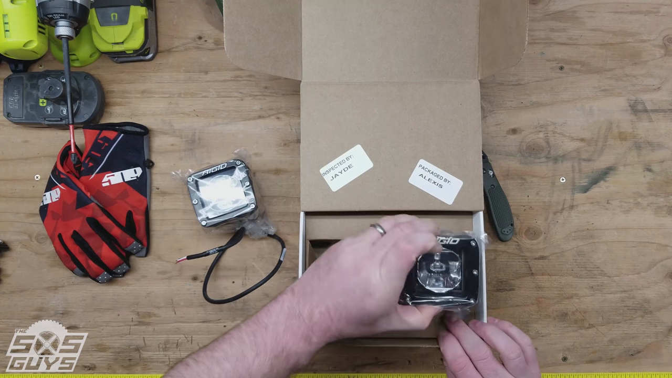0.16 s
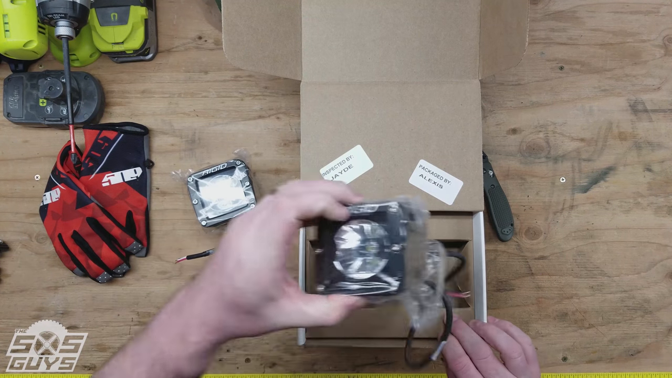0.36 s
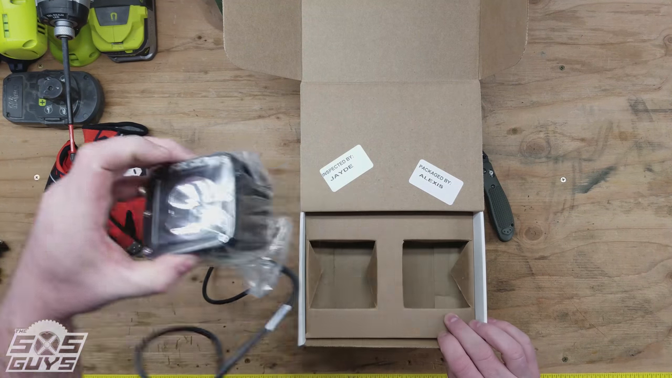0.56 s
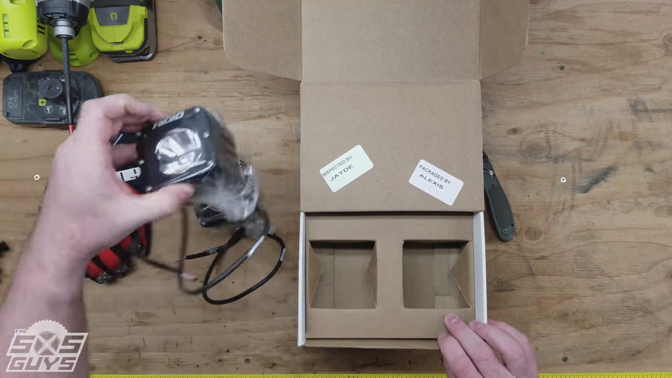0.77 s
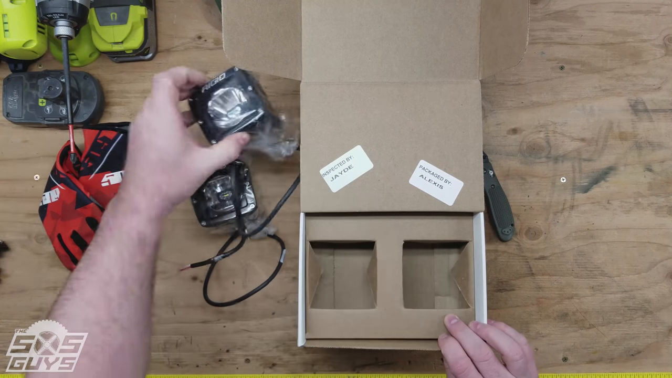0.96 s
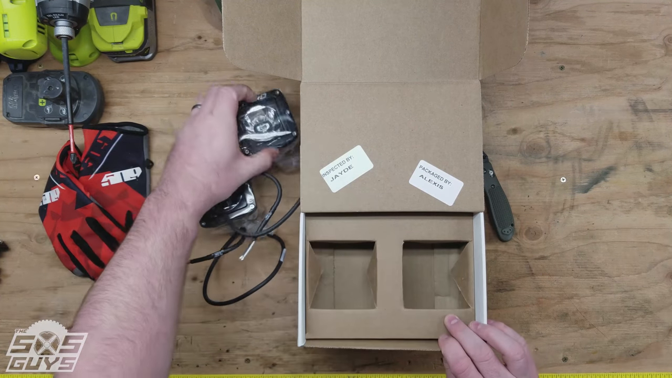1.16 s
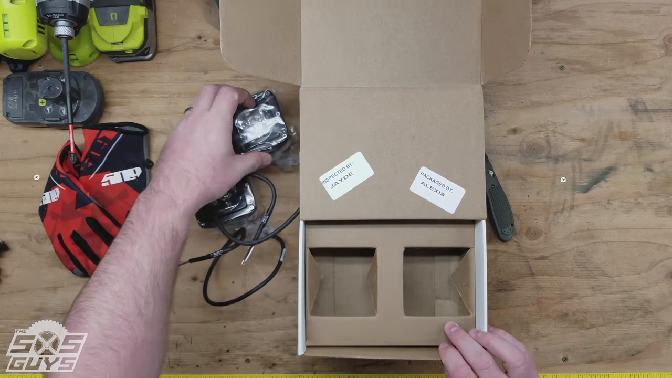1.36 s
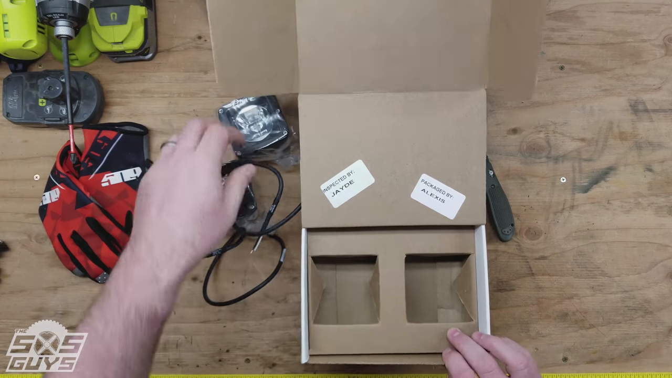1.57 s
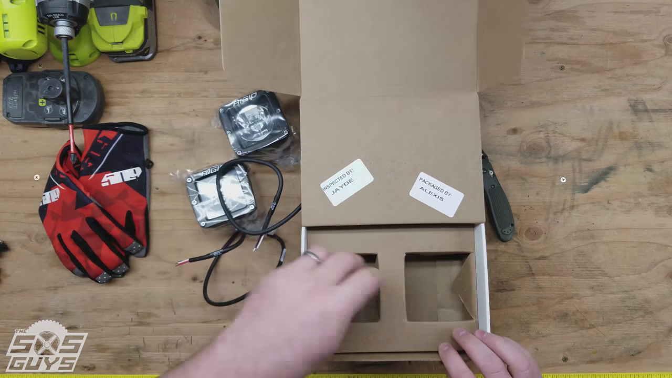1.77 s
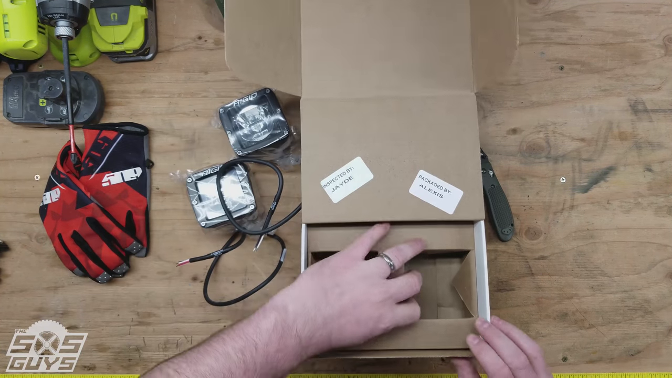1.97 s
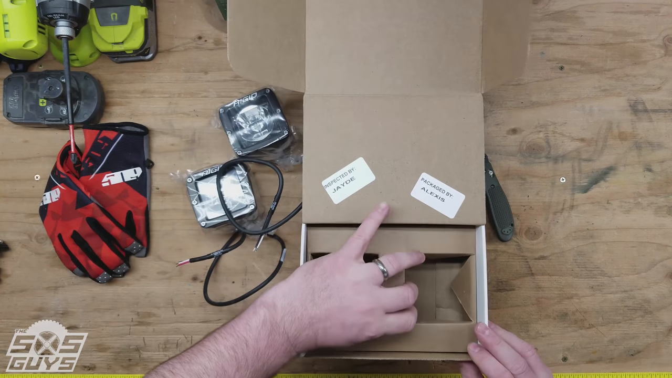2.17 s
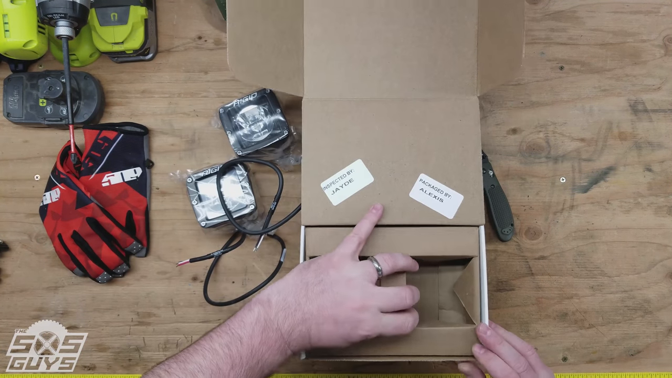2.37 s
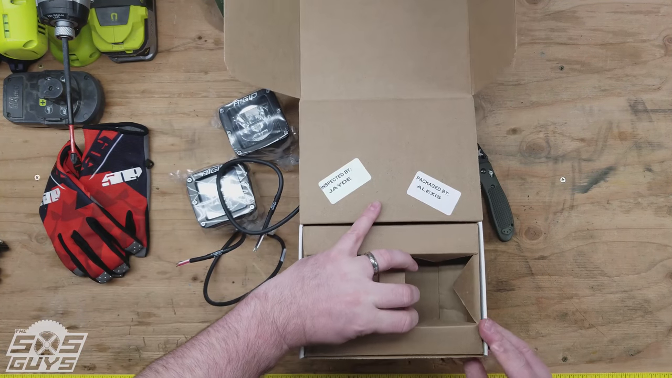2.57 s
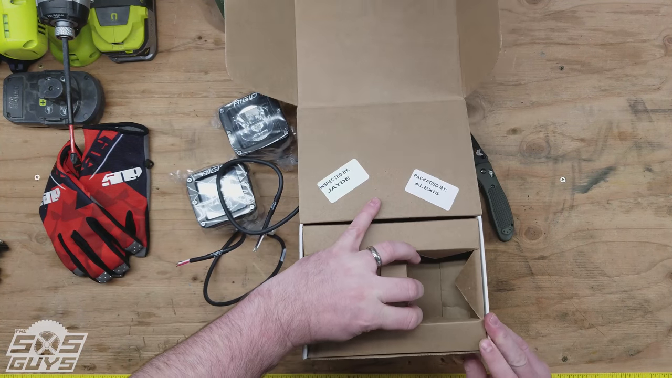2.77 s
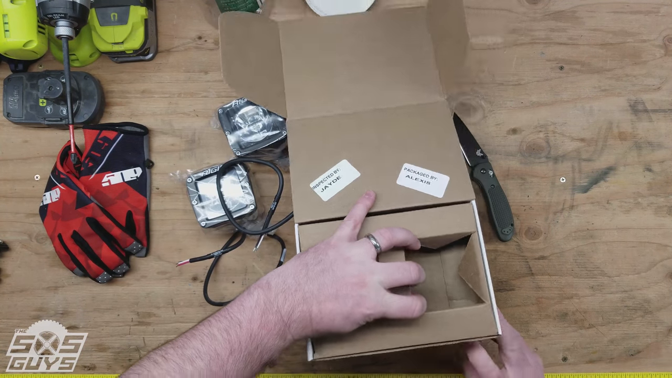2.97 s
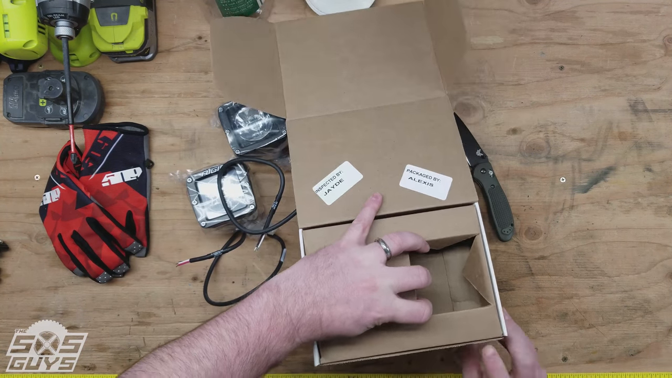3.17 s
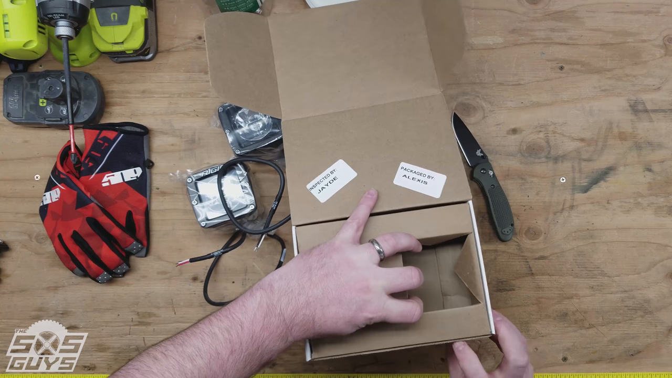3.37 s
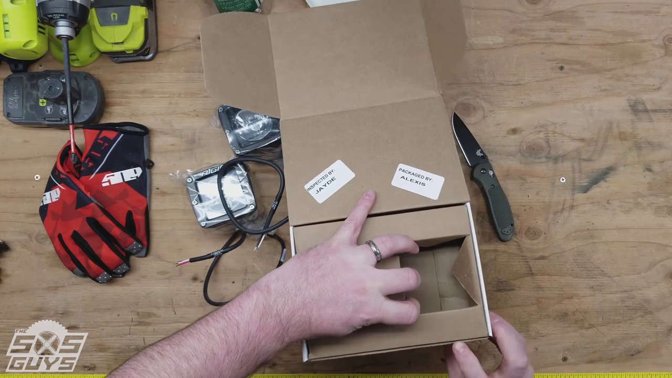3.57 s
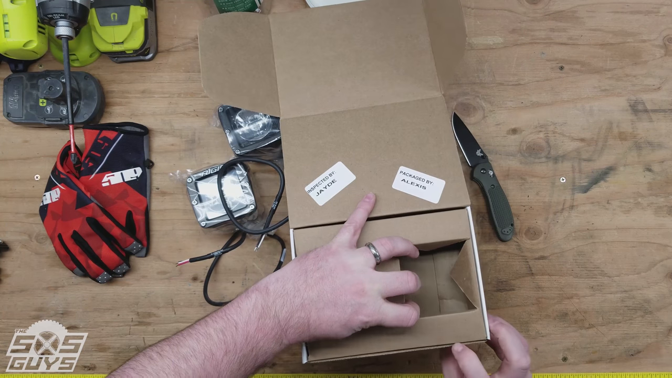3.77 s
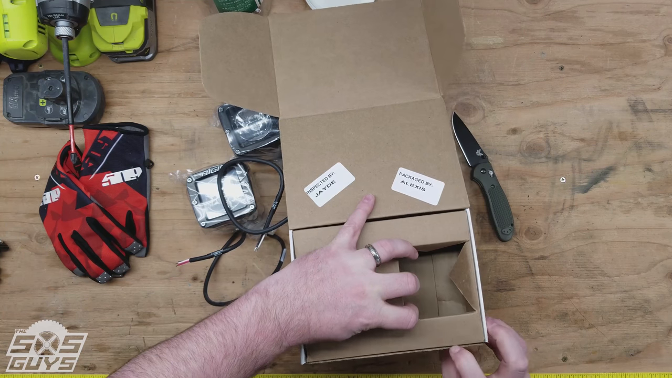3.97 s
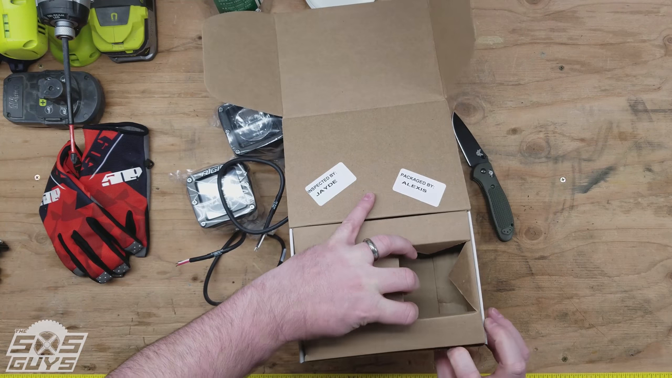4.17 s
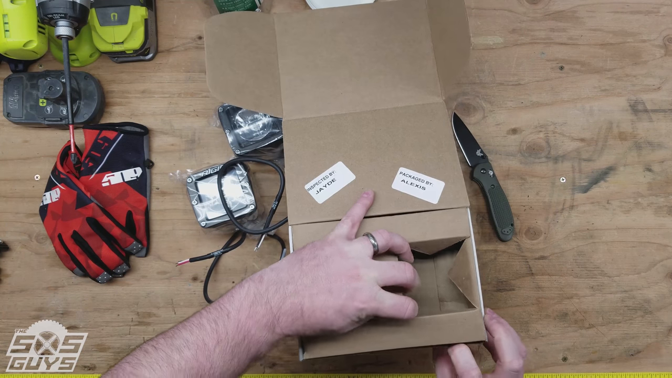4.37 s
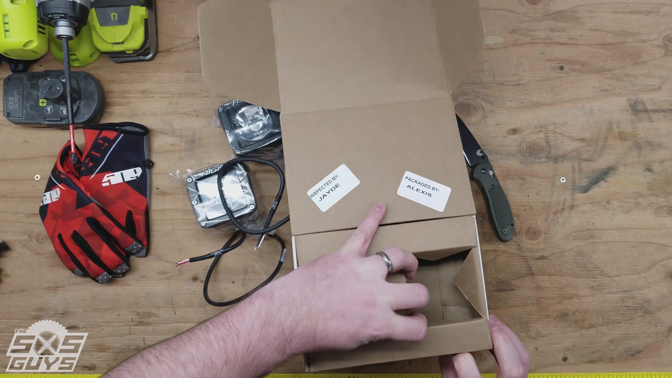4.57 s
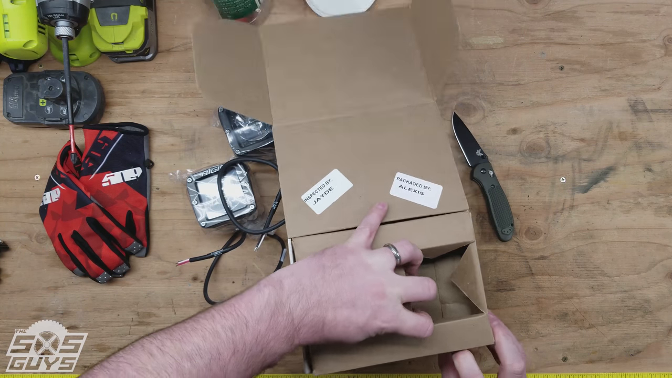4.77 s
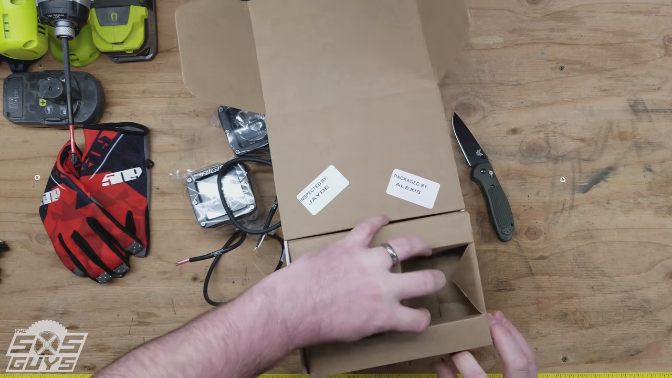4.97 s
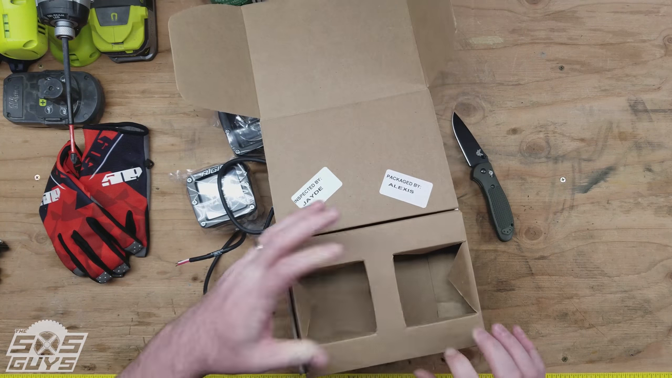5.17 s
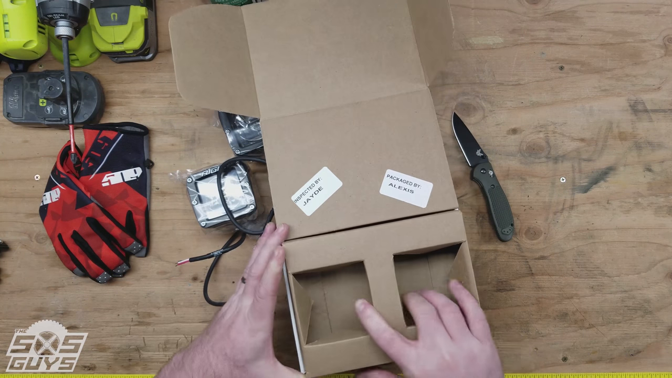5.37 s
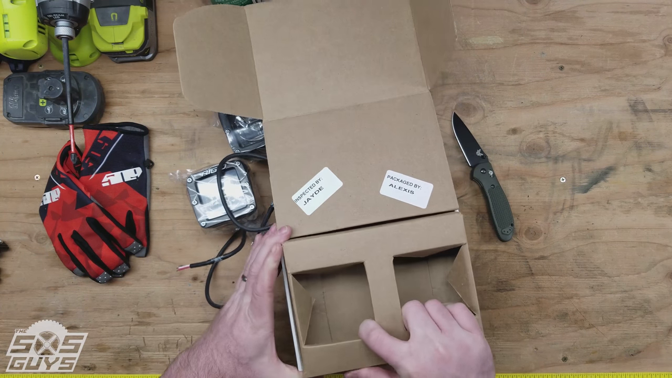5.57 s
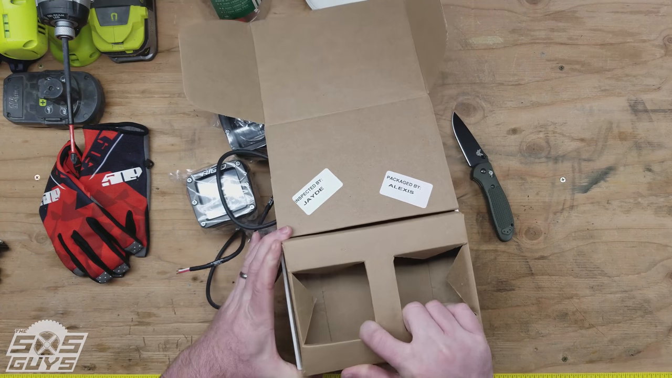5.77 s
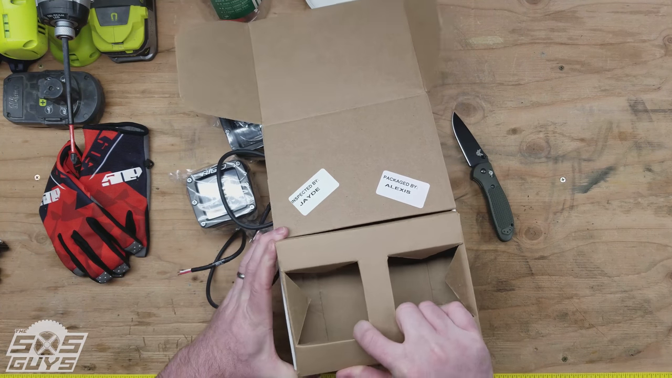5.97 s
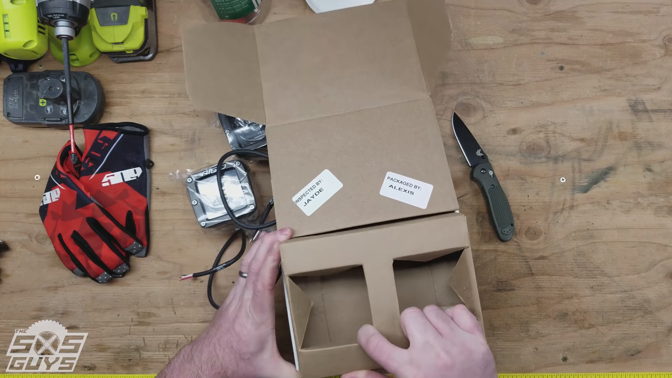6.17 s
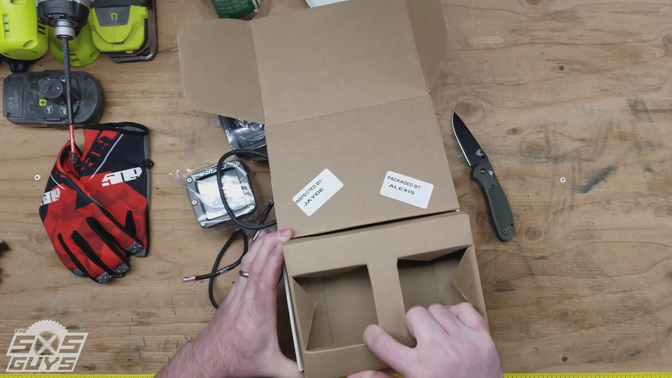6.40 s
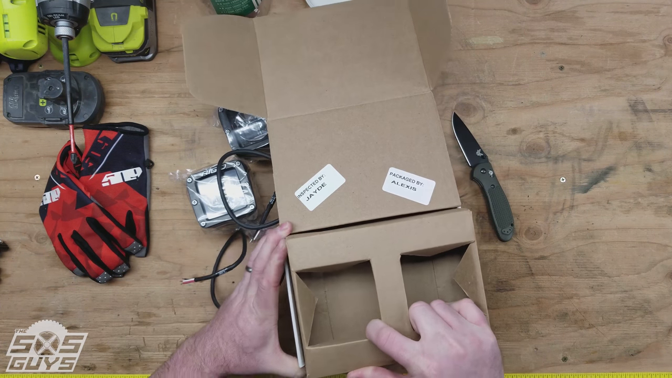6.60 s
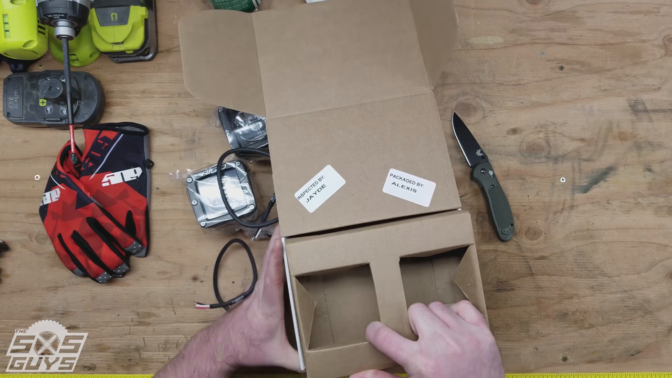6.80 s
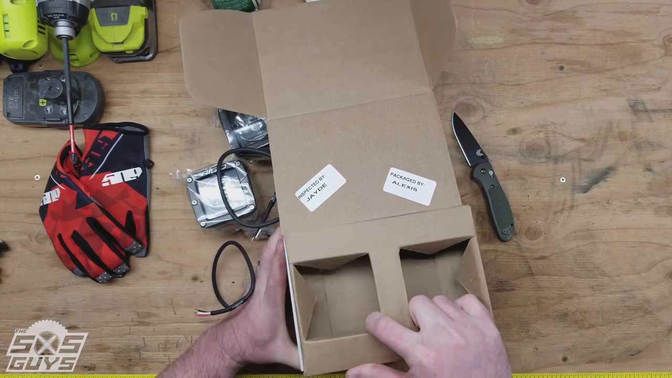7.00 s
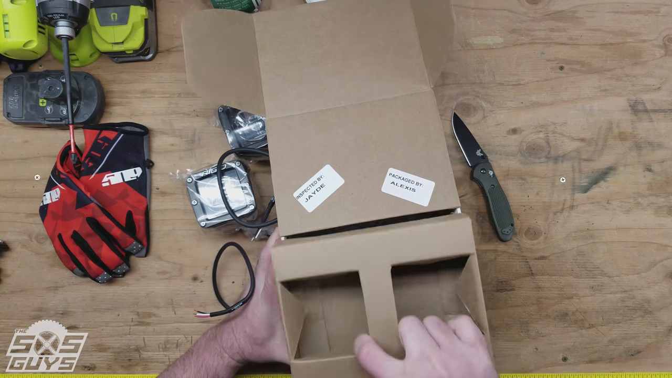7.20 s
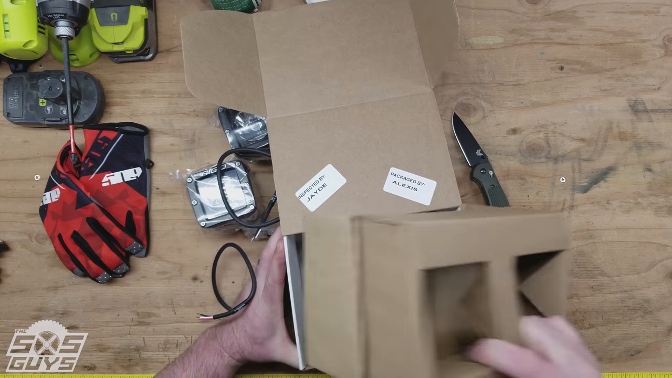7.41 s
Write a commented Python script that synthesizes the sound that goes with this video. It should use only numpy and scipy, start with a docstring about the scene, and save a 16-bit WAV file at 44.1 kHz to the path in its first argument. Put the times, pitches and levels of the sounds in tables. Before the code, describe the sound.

Hands scrape and tug at a hollow cardboard box, with plastic crackles, small clicks and one wooden thump early on.

```python
"""In a workshop, at a wooden bench, hands pull a heavy lamp in a plastic bag from a cardboard box.
The lamp is set down with a thump that makes the bench ring. Then the box's insert is tugged out in
short strokes: card grips and slips on card, so it hisses, drums in the hollow box, knocks and clicks.
Plastic crackles, small metal parts ping, and the rubbing gives one thin, high squeak.
A low rumble fills the room, and the walls echo briefly."""
import sys
import numpy as np
from scipy import signal
from scipy.fft import rfft, irfft, next_fast_len
from scipy.io import wavfile
from scipy.ndimage import uniform_filter1d, map_coordinates

SR = 44100
rng = np.random.default_rng(int(sys.argv[2]) if len(sys.argv) > 2 else 0)


def waveform_to_disk(signal):
    """Save audio, clipped to [-1, 1], as 16-bit WAV at the path in sys.argv[1]."""
    frames = np.transpose(np.atleast_2d(signal))
    scaled = np.clip(frames, -1, 1) * 32767
    samples = np.round(scaled).astype(np.int16)
    wavfile.write(sys.argv[1], SR, samples)


N = 328304

# The tone of the hiss. Each row: frequency in Hz, level in dB.
HISS_TONE = [(1760, -23.5), (3000, -6.5), (3800, -1), (5120, 0.5), (7370, -1.5), (9000, -15.5),
             (11400, -13), (15100, -13), (16200, -31), (16500, -40.5)]
# The tone of the scrape. Each row: frequency in Hz, level in dB.
SCRAPE_TONE = [(530, -13), (900, 0), (995, -2), (1120, -2), (1370, -3), (1490, -1.5), (1770, -4.5),
               (2010, -1), (2440, -1), (2840, -1.5), (3240, -3.5), (4000, -15.5), (5200, -18), (8800, -120)]
# Notes of the hollow channels inside corrugated card. Each row: pitch in Hz, width in Hz, boost in dB.
CARD_CHANNELS = [(1366, 81, 3), (1800, 40, 8), (2436, 98, 2), (2780, 23, 7)]
# Notes of the box's panels. Each row: pitch in Hz, width in Hz, level in dB.
BOX_PANELS = [(376, 29, 4), (518, 62, -6), (636.4, 35, -2), (816.5, 69, -7)]
# Rubs, tugs and crumples. Each row: time of full strength, then swell, hold and fade, all in seconds,
# then levels in dB for the hiss, top hiss, rasp, upper rasp, panels and air in the box.
STROKES = [(0.048, 0.15, 0.01, 0.396, -56.5, -65.5, -57, -64, -56, -59),
           (0.092, 0.057, 0.079, 0.182, -50, -55, -47, -53, -49, -54),
           (0.192, 0.066, 0.0027, 0.179, -46.5, -50, -39.5, -47, -37, -41.5),
           (0.283, 0.017, 0.016, 0.036, -56.0, -69.5, -65.5, -60.5, -63.0, -63),
           (0.341, 0.082, 0.0, 0.21, -51, -54, -36, -44, -32, -37.5),
           (0.389, 0.11, 0, 0.11, -43.5, -50, -48.0, -42, -46.0, -54),
           (0.459, 0.014, 0.0059, 0.092, -48, -50.5, -61, -53, -66, -71),
           (0.889, 0.024, 0.0046, 0.1, -49.5, -55.5, -59.5, -61, -51.5, -54),
           (0.952, 0.0444, 0.00051, 0.13, -52, -57.5, -55.5, -63.5, -55, -49),
           (1.02, 0.037, 0.018, 0.19, -50, -56, -55, -59.5, -50.5, -51),
           (1.091, 0.024, 0.05, 0.405, -58.5, -57, -60, -56, -58, -65.5),
           (1.182, 0.045, 0.017, 0.182, -45, -57, -34, -35.5, -64, -52),
           (1.244, 0.022, 0, 0.398, -47.5, -52, -44.5, -57.5, -59, -57),
           (1.371, 0.013, 0.008, 0.03, -55, -64, -63, -67, -65.5, -64.0),
           (1.562, 0.24, 0.04, 0.13, -58, -60.5, -62, -57, -52, -58.5),
           (1.93, 0.031, 0.0046, 0.26, -59, -61, -47, -55.0, -45, -53),
           (2.02, 0.2, 0.019, 0.138, -74, -67, -53, -57.0, -70, -69),
           (2.23, 0.47, 0.122, 0.034, -57.5, -58.5, -55.5, -56, -53, -55),
           (2.339, 0.15, 0.026, 0.2, -49.5, -52.5, -50.5, -47, -46, -36),
           (2.455, 0.158, 0.13, 0.036, -58.5, -61.5, -54.5, -57, -47.5, -44),
           (2.592, 0.018, 0.033, 0.034, -51.5, -52.5, -51, -49.5, -42, -34),
           (2.672, 0.238, 0.036, 0.23, -59.5, -61.5, -57.5, -54, -47, -46.5),
           (2.829, 0.19, 0.024, 0.041, -65, -61, -71, -59.5, -55.5, -48.5),
           (2.981, 0.21, 0.014, 0.19, -45, -44.5, -45.5, -46, -38.5, -43.5),
           (3.098, 0.037, 0.02, 0.11, -64, -60, -51, -51, -42.5, -44.5),
           (3.17, 0.126, 0.0011, 0.42, -54.5, -53.0, -57, -58.5, -63, -51),
           (3.297, 0.23, 0.046, 0.27, -60.5, -61.5, -55, -59, -49.5, -53.5),
           (3.58, 0.64, 0.001, 0.65, -66, -80, -68, -72.5, -61.5, -57.5),
           (3.747, 0.17, 0.15, 0.82, -71.5, -67.5, -73, -71, -67, -58.5),
           (3.923, 0.053, 0.001, 0.049, -61, -60.5, -58.5, -53.5, -51, -43.5),
           (4.142, 0.067, 0.021, 0.18, -49.0, -48, -50, -47.5, -58, -34.5),
           (4.251, 0.28, 0, 0.3, -52, -54, -49.5, -48.5, -38.5, -37.5),
           (4.49, 0.08, 0.08, 0.48, -62, -62, -58.5, -59.5, -55.5, -58),
           (4.605, 0.056, 0.16, 0.42, -66.0, -67, -58, -61, -49, -61.5),
           (4.715, 0.02, 0.028, 0.11, -45.5, -47.5, -50, -43, -46.5, -41.5),
           (4.842, 0.041, 0.041, 0.071, -49, -50, -52.0, -51.0, -44, -44.5),
           (5.006, 0.144, 0.012, 0.178, -54.5, -54.0, -53.5, -53, -49, -45.5),
           (5.072, 0.067, 0.045, 0.16, -49, -55.5, -43.5, -46.0, -43, -50.0),
           (5.255, 0.028, 0, 1, -62.5, -66, -58, -58.0, -50, -51.5),
           (5.313, 0.014, 0.02, 0.171, -57.5, -53.5, -63.5, -59, -66, -54),
           (5.418, 0.094, 0.045, 0.28, -51.5, -51, -54.5, -50, -53.0, -60),
           (5.599, 0.171, 0.019, 0.085, -55.5, -52.5, -51, -55, -48.5, -49.5),
           (5.729, 0.11, 0.058, 0.2, -57, -55.0, -55.5, -54.0, -54, -52.0),
           (5.811, 0.027, 0.039, 0.11, -60, -63.5, -56, -52.5, -46.5, -47.5),
           (5.906, 0.032, 0.02, 0.087, -50.5, -51.5, -47.5, -47, -40, -42.5),
           (6.004, 0.072, 0.042, 0.298, -53, -55, -55.0, -50.5, -46, -45.5),
           (6.169, 0.019, 0.041, 0.382, -55, -54.5, -54.5, -50, -44.5, -41),
           (6.31, 0.084, 0.029, 0.057, -47.5, -49.5, -53, -44.5, -42.5, -41.5),
           (6.434, 0.17, 0, 1, -67.0, -68.5, -67, -59, -49, -47),
           (6.546, 0.052, 0.015, 0.051, -50.5, -53, -49, -50.5, -46, -49.5),
           (6.698, 0.281, 0.043, 0.082, -55, -54.5, -55.5, -56, -51, -69),
           (6.82, 0.069, 0.058, 0.12, -57.5, -55.5, -63.5, -63, -59, -68.5),
           (7.0, 0.024, 0.071, 0.067, -42, -45.5, -47, -46.0, -42.5, -45.5),
           (7.184, 0.066, 0.047, 0.043, -44.5, -44.5, -49.0, -45, -45, -47.5),
           (7.225, 0.034, 0.015, 0.068, -44, -47.0, -59, -61, -35, -28),
           (7.358, 0.42, 0, 0.261, -42.5, -43, -43.5, -47.5, -37, -39)]
def card_rubbing():
    """Card slides on card: it hisses, rasps, and by gripping and slipping drums the box and its air."""
    hiss_gain, top_gain, rasp_gain, upper_gain, panel_gain, air_gain = map(
        stroke_gain, np.transpose(STROKES)[4:])

    fine = friction_noise(grain_db=1.0, grains_per_s=220, patchy_db=2.0)
    hiss_share = lambda f: 1 / (1 + (f / 8800) ** 12)
    hiss = unit_centre(filtered(fine, lambda f: amp(along(HISS_TONE, f)) * hiss_share(f)))
    top = unit_centre(filtered(fine, lambda f: amp(along(HISS_TONE, f)) * (1 - hiss_share(f))))
    hissing = (hiss_gain * hiss + top_gain * top) * grip(CREASES, depth_db=4, lead_s=0.024)

    # Narrow, long patches give hollow notes that linger through a stroke.
    coarse = friction_noise(grain_db=1.5, grains_per_s=170, patchy_db=3, patch_bins=3, patch_frames=20)
    boost_db = lambda f: sum(db * np.abs(resonance(f, hz, width)) ** 2 for hz, width, db in CARD_CHANNELS)
    card = lambda f: amp(along(SCRAPE_TONE, f) + boost_db(f))
    rasp_share = lambda f: 1 / (1 + (f / 2100) ** 8)
    rasp = unit(filtered(coarse, lambda f: card(f) * rasp_share(f)))
    upper = unit(filtered(coarse, lambda f: card(f) * (1 - rasp_share(f))))
    scraping = (rasp_gain * rasp + upper_gain * upper) * grip(EDGE_SNAPS, depth_db=4, lead_s=0.018)

    slips = friction_noise(grain_db=2.5, grains_per_s=90, patchy_db=1.16)
    panel_notes = lambda f: sum((-1) ** k * amp(db) * resonance(f, hz, width)
                                for k, (hz, width, db) in enumerate(BOX_PANELS))
    panels = unit(filtered(slips, lambda f: panel_notes(f) * resonance(f, hz=664, width=700)))
    air = unit(filtered(slips, lambda f: resonance(f, hz=275.6, width=32.4) * resonance(f, 271, 100)))
    air = unit(air / np.abs(signal.hilbert(air[0])) ** 0.62)  # steady rubbing keeps the air note even
    drumming = (panel_gain * panels + air_gain * air) * grip(BOX_BUMPS, depth_db=4.5, lead_s=0.019)
    return hissing + scraping + drumming


def stroke_gain(level_db, span_db=30):
    """Each stroke swells by span_db, holds, and fades as far; overlapping strokes add their power."""
    start, swell, hold, fade = np.transpose(STROKES)[:4, :, None]
    t = np.arange(0, N, 64) / SR
    drop = np.maximum((start - t) / swell, (t - start - hold) / fade).clip(min=0)
    power = amp(level_db) ** 2 @ amp(-span_db * drop) ** 2
    return np.interp(np.arange(N) / SR, t, np.sqrt(power))


def grip(events, depth_db, lead_s):
    """Surfaces grip and go quieter just before they let go with a snap."""
    t = np.arange(N) / SR
    starts = np.sort(np.transpose(events)[0])
    wait = np.append(starts, 99)[np.searchsorted(starts, t)] - t
    return amp(-depth_db * np.exp(-wait / lead_s))


# How alike left and right sound. Each row: frequency in Hz, likeness (1 is the same, 0 is unrelated).
STEREO_LIKENESS = [(60, 0.95), (180, 1), (550, 0.86), (1650, 0.43), (4970, -0.093), (15000, 0.064)]
def friction_noise(grain_db, grains_per_s, patchy_db, patch_bins=8, patch_frames=8):
    """Fibres catch unevenly: stereo noise that flickers in level and in patches of pitch and time."""
    grainy = rng.standard_normal((2, N)) * amp(grain_db * wobble(grains_per_s))
    spectrum = signal.stft(grainy, nperseg=512)[2]
    patches = uniform_filter1d(rng.standard_normal(spectrum.shape[1:]), patch_bins, axis=0)
    patches = uniform_filter1d(patches, patch_frames, axis=1)
    pair = signal.istft(spectrum * amp(patchy_db * unit(patches)), nperseg=512)[1][:, :N]
    spread = lambda hz: np.arccos(np.clip(along(STEREO_LIKENESS, hz), -1, 1)) / 2
    mid, side = filtered(pair, lambda hz: np.array([np.cos(spread(hz)), np.sin(spread(hz))]))
    return np.array([mid + side, mid - side])


# The bench top's clear notes. Each row: pitch in Hz, level in dB, seconds to fade by 60 dB.
BENCH_NOTES = [(169, -34, 0.57), (209, 0, .16), (255.6, 6, 0.16), (317, -6, 0.16), (386, -8, 0.34),
               (400, -11.5, .3), (496, 2, 0.2), (567, -4.5, 0.31), (603, -25.5, 0.39), (680, -29, 0.35),
               (784, -17.5, .28), (850, -14.5, .3), (877, -27, .35)]
# The wood's many weak notes, blurred into a roar. Each row: frequency in Hz, level in dB.
WOOD_TONE = [(76, -46.5), (130, -33), (163, -2.5), (225, -20), (259, -7), (333, -8), (606, -6),
             (950, -25.5), (1240, -62.5), (2090, -120)]
# The lamp touches with one edge, then lands. Each row: start in seconds, strength in dB.
LAMP_BLOWS = [(1.1626, -35), (1.1850, -10.5)]
def lamp_thump():
    """Each blow of the lamp sets the bench top ringing: clear notes over a dense wooden roar."""
    push = np.hanning(round(0.0015 * SR))  # a soft contact lasts over a millisecond
    notes = np.convolve(sum(ring(*note) for note in BENCH_NOTES), push / push.sum())
    no_deep_bass = signal.butter(4, 140, "high", fs=SR, output="sos")  # a board gives off no deep bass
    notes = signal.sosfilt(no_deep_bass, notes)
    notes[:SR // 2] += ring(hz=48, db=-17, fade_s=0.2)  # the frame of the bench shudders
    mid, side = unit(filtered(rng.standard_normal((2, N)), lambda f: amp(along(WOOD_TONE, f))))
    roar = mid + 0.5 * side * [[1], [-1]]
    roar_rise_s, roar_fade_s = 0.01, 0.33
    out = np.zeros((2, N))
    for start, db in LAMP_BLOWS:
        t = np.maximum(np.arange(N) / SR - start, 0)
        out[:, round(start * SR):][:, :len(notes)] -= amp(db) * notes
        out += amp(db - 60 * t / roar_fade_s) * (1 - np.exp(-t / roar_rise_s)) * roar
    return out


def ring(hz, db, fade_s):
    """One struck note that dies away by 60 dB in fade_s."""
    t = np.arange(SR // 2) / SR
    return amp(db - 60 * t / fade_s) * np.sin(2 * np.pi * hz * t)


# Each row: start in seconds, level in dB before muffling, pitch in Hz, seconds to fade by 60 dB.
BOX_BUMPS = [(.193, -32.5, 356, .053), (.235, -28, 358, 0.098), (.308, -29.5, 326, 0.04),
             (.341, -18, 530, .09), (.378, -26, 490, 0.061), (.952, -30.5, 444, 0.16),
             (1.024, -37, 267, 0.07), (1.921, -35, 266, .041), (2.477, -31, 280, 0.083),
             (2.674, -32.5, 253, 0.053), (2.891, -31, 750, 0.071), (2.982, -21, 249, 0.064),
             (3.097, -21, 380, 0.063), (3.111, -28, 514, 0.051), (3.908, -37, 268, .071),
             (4.227, -41, 293, .072), (4.292, -30.5, 290, 0.09), (4.386, -31.5, 290, 0.05),
             (4.463, -34.5, 360, 0.046), (4.494, -35, 480, 0.058), (4.744, -32.5, 268, 0.15),
             (4.878, -32, 258, 0.045), (4.991, -35, 298, 0.082), (5.072, -18.5, 262, 0.066),
             (5.812, -36, 250, .055), (5.918, -20.5, 469, 0.097), (6.299, -24, 253, .083),
             (6.332, -21, 590, .042), (6.43, -27, 254, 0.064), (6.546, -26.5, 394, 0.034),
             (7.164, -35, 397, .08), (7.228, -29.5, 277, 0.096), (7.368, -18.5, 318, 0.072)]
def box_knocks(muffle_hz=910):
    """The box gets bumped. Card and wood are soft, so the knocks have little treble."""
    bumps = bursts(BOX_BUMPS, sharpness=1.2, likeness=1.0, snap=1.73, delay_s=0.0014)
    return signal.sosfilt(signal.butter(4, muffle_hz, fs=SR, output="sos"), bumps)


# Each row: start in seconds, level in dB, pitch in Hz, seconds to fade by 60 dB.
EDGE_SNAPS = [(.0895, -31, 1610, 0.041), (.1109, -30, 1640, .042), (.1745, -26, 2220, 0.025),
              (.194, -26, 1610, .035), (.2369, -21.5, 1440, 0.038), (.3084, -22.5, 1540, .03),
              (.3406, -18.5, 937, 0.11), (.3785, -21.5, 2900, 0.041), (.8883, -48, 1370, .03),
              (1.0191, -43, 1030, .03), (1.0443, -33.5, 1820, 0.042), (1.1635, -24, 1660, 0.049),
              (1.1925, -17.5, 1570, .055), (1.914, -39.5, 1540, .09), (2.0004, -38, 1610, .03),
              (2.3331, -35, 2670, .024), (2.892, -43, 1500, .025), (2.979, -27.5, 2850, 0.047),
              (3.0977, -42, 1340, 0.035), (4.137, -41.5, 2400, 0.033), (4.7094, -36, 2720, 0.071),
              (5.0722, -35, 1820, .03), (5.0968, -34, 2240, .03), (5.252, -40, 1740, 0.067),
              (5.31, -40, 1730, 0.041), (5.3795, -40, 1670, .033), (5.813, -38, 2000, 0.028),
              (5.9065, -39, 2180, .03), (5.9212, -30.5, 1050, 0.034), (6.071, -43.5, 1490, .02),
              (6.334, -30.5, 1310, 0.049), (6.4304, -41, 1050, 0.041), (6.548, -27.5, 2130, 0.022),
              (6.632, -46, 1500, .025), (6.7292, -33, 2670, 0.051), (6.995, -56, 3070, .03),
              (7.1766, -33.5, 3190, .033), (7.3128, -28.5, 3070, .03), (7.376, -36, 1110, 0.088)]
def card_clicks():
    """Edges of the card snap free with a click."""
    return bursts(EDGE_SNAPS, sharpness=1.3, likeness=0.46, snap=1.7)


# Each row: start in seconds, level in dB, pitch in Hz.
CREASES = [(.042, -44, 8950), (.0822, -31.5, 6060), (.185, -32, 6100), (.287, -31.5, 4470),
           (.3405, -24.5, 5000), (.38, -23, 4800), (.4614, -36.5, 7260), (.8884, -31, 6400),
           (0.9425, -40.5, 9080), (1.02, -31.5, 5900), (1.0864, -34.5, 8470), (1.1162, -38, 7700),
           (1.1643, -36.5, 5390), (1.2516, -26, 13040), (1.3294, -31.5, 12600), (1.38, -41, 5970),
           (1.4674, -39, 11800), (2.593, -37.5, 6770), (2.799, -42, 12100), (2.9802, -24.5, 7700),
           (3.9113, -40.5, 7340), (4.135, -34.5, 12200), (4.72, -35, 4640), (4.8433, -44, 6120),
           (5.31, -36.5, 14000), (5.38, -39, 8960), (5.393, -30, 12800), (5.7024, -35, 13300),
           (5.909, -41.5, 5500), (6.0008, -41, 4890), (6.1704, -40.5, 7800), (6.2936, -39, 6100),
           (6.3327, -28, 7070), (6.547, -30, 6100), (6.733, -32, 4460), (7.0, -28, 7200),
           (7.1603, -43, 5500), (7.2185, -27.5, 7100)]
def crackles(fade_s=0.033):
    """The plastic bag and the card's skin crease with tiny, bright cracks."""
    return bursts([(*row, fade_s) for row in CREASES], sharpness=0.27, likeness=0.3, snap=2.9)


# Each row: start in seconds, level in dB, pitch in Hz, seconds to fade by 60 dB.
PINGS_AND_SQUEAK = [(1.045, -39.5, 1885, 0.04), (1.045, -38.5, 3870, 0.043), (1.09, -51, 1980, 0.045),
                    (1.655, -64, 4620, 0.36), (1.655, -58, 7500, 0.14), (3.51, -61.5, 4400, .25),
                    (3.61, -51, 6700, 0.16)]
def pings_and_squeak():
    """Small metal pings and one thin, high squeak of rubbing, each with a clear pitch."""
    return bursts(PINGS_AND_SQUEAK, sharpness=17, likeness=0.6, snap=3)


def bursts(events, sharpness, likeness, snap, delay_s=0):
    """Each event is a sharp contact and a dying puff of noise; more sharpness gives a clearer pitch."""
    out = np.zeros((2, N + SR))
    t = np.arange(SR // 5) / SR
    f = np.fft.rfftfreq(2 * len(t), 1 / SR)
    spread = np.arccos(likeness) / 2
    for start, db, hz, fade_s in events:
        mid, side = rng.standard_normal((2, len(t)))
        mid[0] = -snap * np.sqrt(SR / hz)  # the contact, as strong as a few cycles of the noise
        puff = np.cos(spread) * mid + np.sin(spread) * side * [[1], [-1]]
        puff *= amp(-60 * t / fade_s)
        width = hz / sharpness
        # A broad puff with a clearer note inside it.
        colour = resonance(f, hz, width) ** 2 + 1.2 * resonance(f, hz, width / 6.5) ** 2
        puff = irfft(rfft(puff, 2 * len(t)) * colour)[:, :len(t)]
        out[:, round((start + delay_s) * SR):][:, :len(t)] += amp(db) * puff / np.abs(puff).max()
    return out[:, :N]


# The tone of the rumble. Each row: frequency in Hz, level in dB.
RUMBLE_TONE = [(15, -72), (25, -31.5), (64, -12.5), (72, -35.5), (78, -6), (102, -1), (149, -10),
               (180, -18.5), (217, -17.5), (317, -30.5), (476, -32), (936, -62), (1790, -51.5), (3430, -64),
               (7000, -61), (16000, -68)]
# How the rumble rises and falls. Each row: time in seconds, level in dB.
RUMBLE_LEVELS = [(0.0, -50), (0.64, -42), (0.95, -44.5), (1.2, -40.5), (1.41, -45.5), (1.66, -49.5),
                 (2.65, -47), (2.82, -40.5), (2.98, -42), (3.6, -46), (4.37, -43), (4.43, -43), (5.12, -46),
                 (5.66, -42.5), (6.61, -44), (6.94, -43), (7.11, -41), (7.44, -45)]
def building_rumble():
    """The building drones low, over a faint hiss."""
    level_db = np.interp(np.arange(N) / SR, *np.transpose(RUMBLE_LEVELS))
    noise = friction_noise(grain_db=-0.27, grains_per_s=2.2, patchy_db=0.5)
    return amp(level_db) * unit(filtered(noise, lambda f: amp(along(RUMBLE_TONE, f))))


# How long the room rings. Each row: frequency in Hz, seconds to fade by 60 dB.
ECHO_FADES = [(150, 0.38), (600, 0.5), (2000, 0.57), (10000, 0.85)]
def wall_echo(sound):
    """The walls throw the sound back a moment later, and each frequency dies at its own speed."""
    hz, t, noise = signal.stft(rng.standard_normal((2, SR // 2)), SR, nperseg=256)
    # Long, low waves reach both microphones alike.
    spread = np.arccos(np.clip(along(STEREO_LIKENESS, hz), 0, 1))[:, None] / 2
    stereo = np.cos(spread) * noise[0] + np.sin(spread) * noise[1] * [[[1]], [[-1]]]
    tail = signal.istft(stereo * amp(-60 * t / along(ECHO_FADES, hz)[:, None]), SR, nperseg=256)[1]
    delayed = np.pad(sound, (400, 0))[None]
    return signal.fftconvolve(delayed, tail / np.linalg.norm(tail[0]), axes=1)[:, :N]


def amp(db):
    """Turn decibels into a gain."""
    return 10 ** (np.asarray(db) / 20)


def unit(x):
    """Scale a sound to an average power of 1."""
    return x / np.sqrt(np.mean(x ** 2) + 1e-20)


def unit_centre(x):
    """Scale a stereo sound so that the average of left and right has a power of 1."""
    return x / np.sqrt(np.mean(x.mean(0) ** 2) + 1e-20)


def along(points, hz):
    """Read between the rows of a (frequency, value) table, on a log frequency scale."""
    f, values = np.transpose(points)
    return np.interp(np.log(hz + 1), np.log(f + 1), values)


def wobble(rate):
    """A smooth curve through `rate` random values a second."""
    return map_coordinates(rng.standard_normal(int(N * rate / SR) + 4), [np.arange(N) * rate / SR])


def filtered(x, response):
    """Multiply each frequency f in a sound by response(f)."""
    size = next_fast_len(N + SR // 2)
    return irfft(rfft(x, size) * response(np.fft.rfftfreq(size, 1 / SR)), size)[..., :N]


def resonance(f, hz, width):
    """A filter shape that rings at hz and lets through a band `width` Hz wide."""
    return 1j * f * width / (hz * hz - f * f + 1j * f * width)


def scene():
    """All the sources together; only the short sounds get an echo."""
    hits = lamp_thump() + box_knocks() + card_clicks() + crackles() + pings_and_squeak()
    return hits + amp(-10.5) * wall_echo(hits.mean(0)) + card_rubbing() + building_rumble()


# The left microphone is more sensitive. Each row: frequency in Hz, dB by which left is louder than right.
LEFT_LEAD = [(60, 1.5), (180, 2.0), (550, 3), (1650, 3), (4970, 2.5), (15000, 5.5)]
def record(dry):
    """Round off the loudest peak, favour the left side and cut the very highest treble."""
    ceiling, top_hz = 0.82, 15900
    rounded = dry / (1 + np.abs(dry / ceiling) ** 6) ** (1 / 6)
    balance = lambda hz: amp(np.array([[0.5], [-0.5]]) * along(LEFT_LEAD, hz))
    return filtered(rounded, lambda hz: balance(hz) * (hz < top_hz))


dry = scene()
out = record(dry)
waveform_to_disk(out)
```